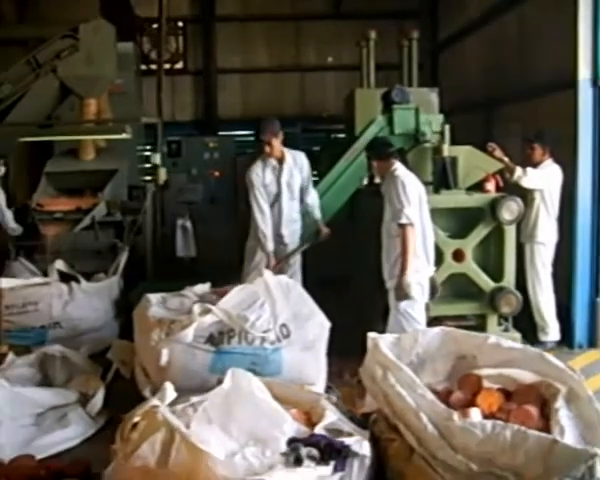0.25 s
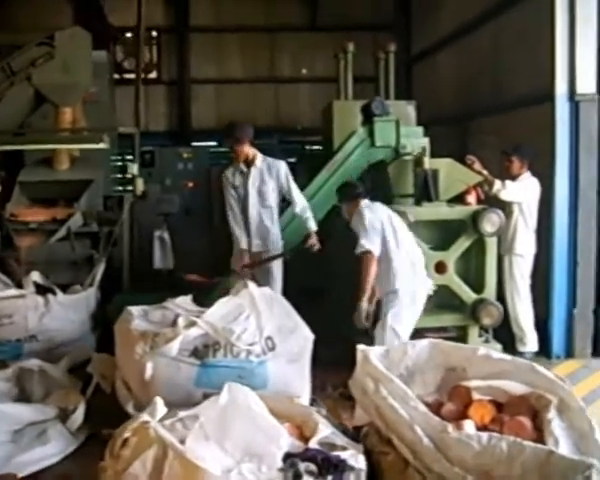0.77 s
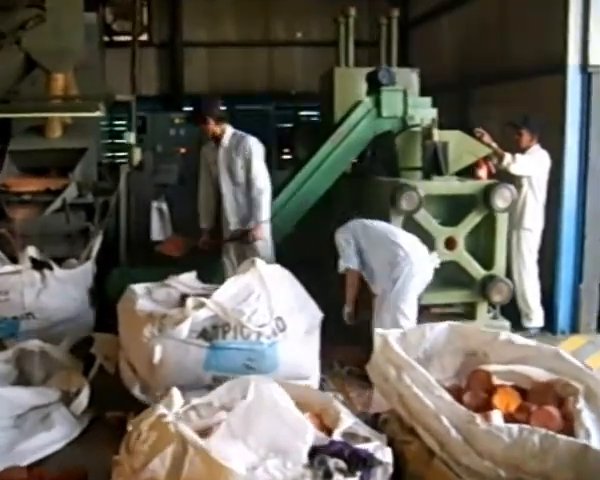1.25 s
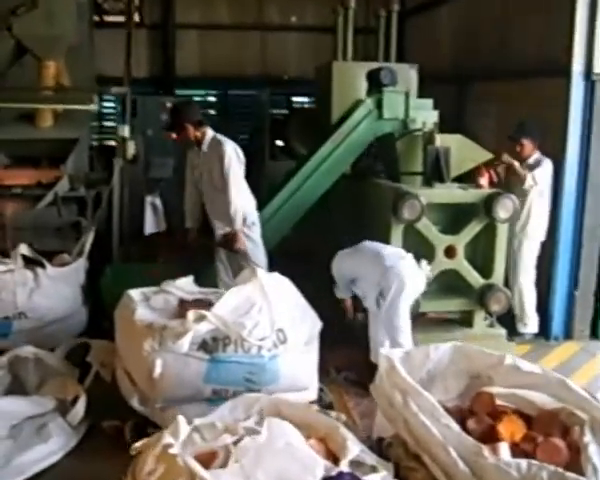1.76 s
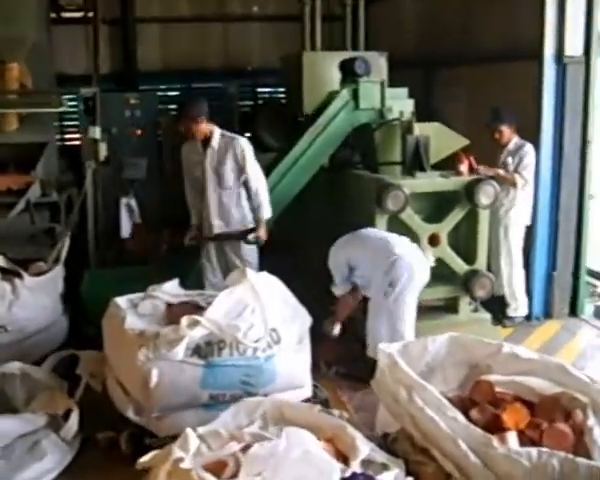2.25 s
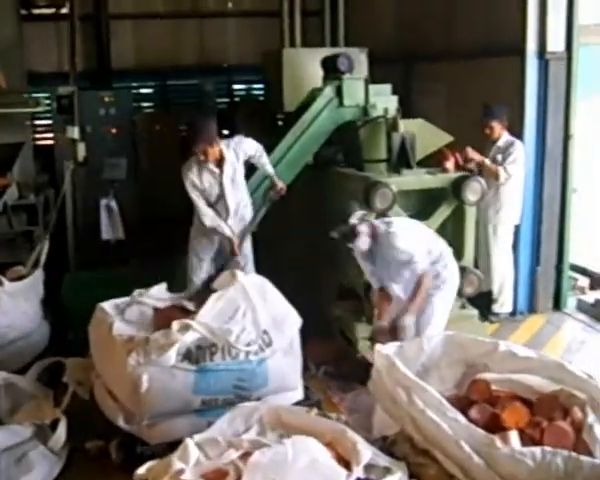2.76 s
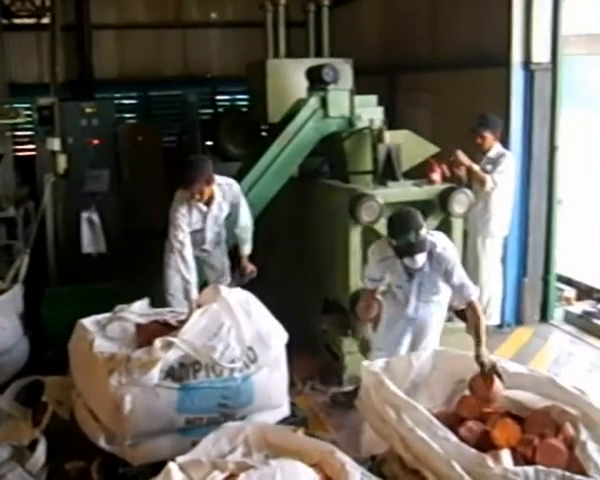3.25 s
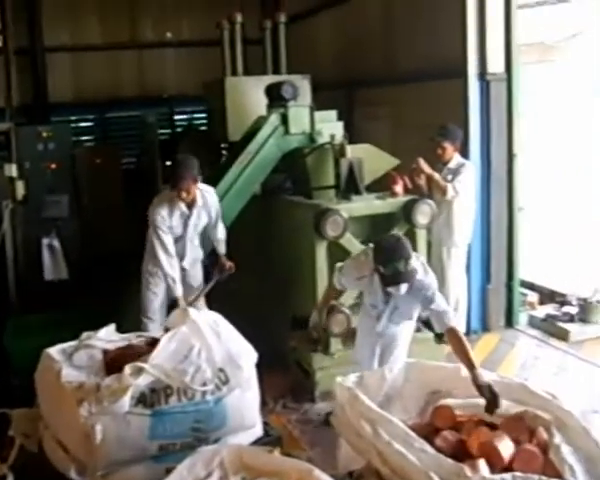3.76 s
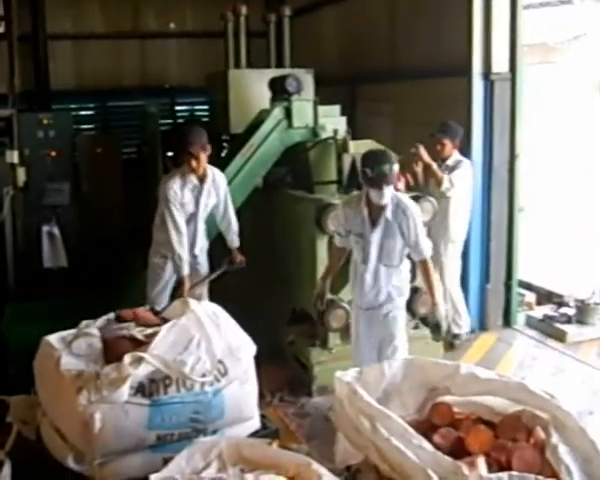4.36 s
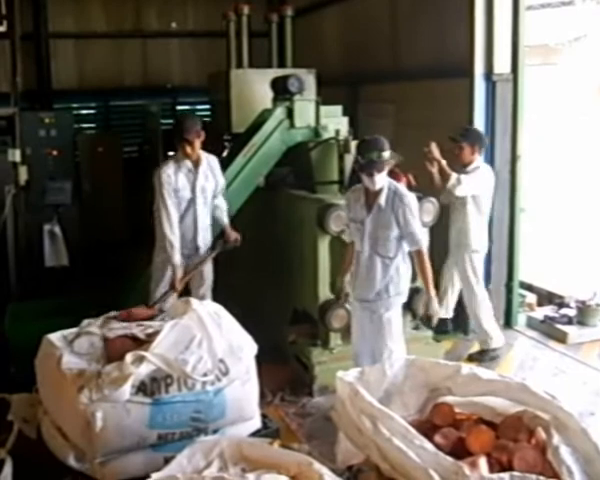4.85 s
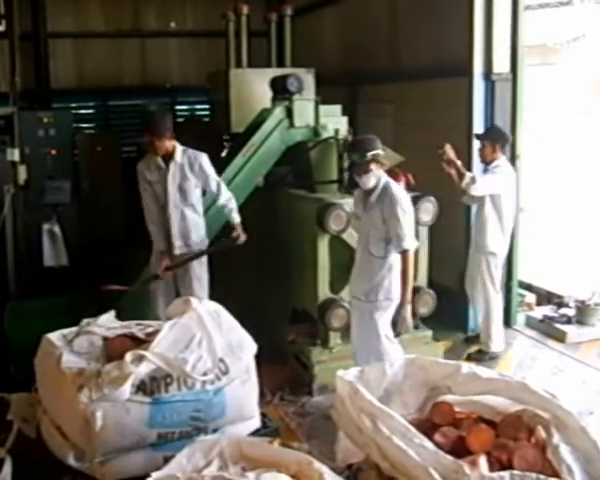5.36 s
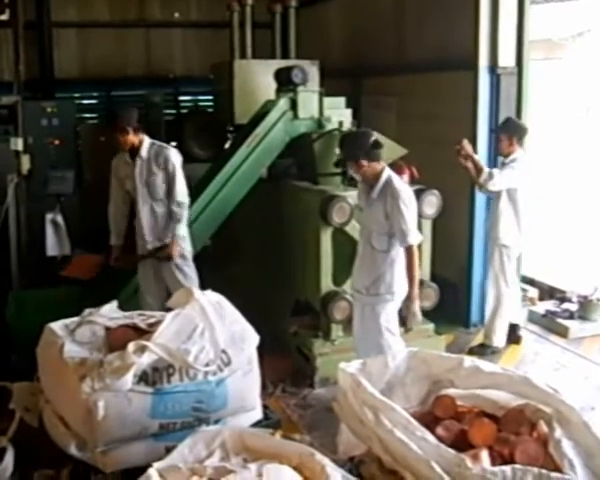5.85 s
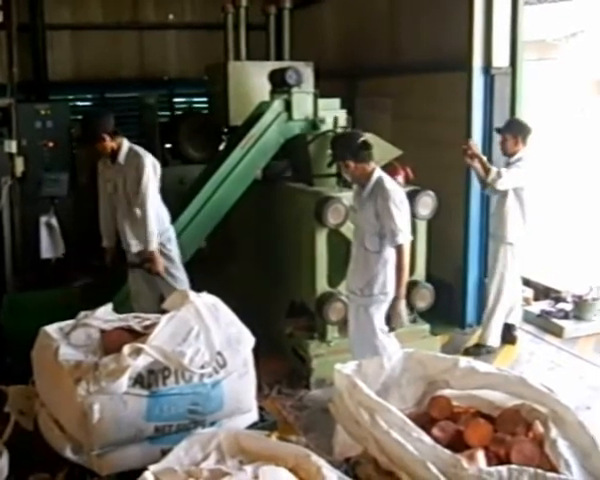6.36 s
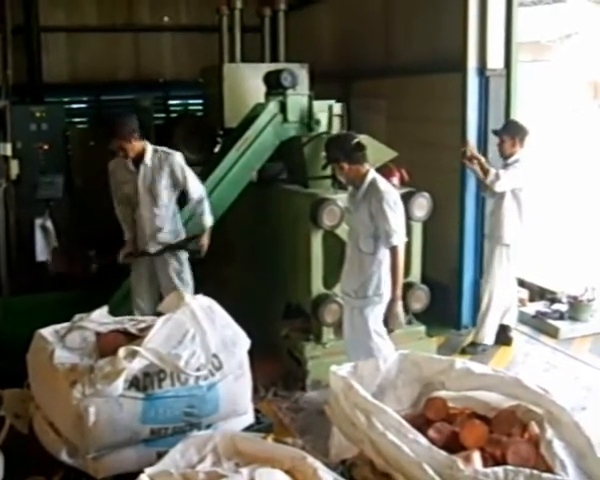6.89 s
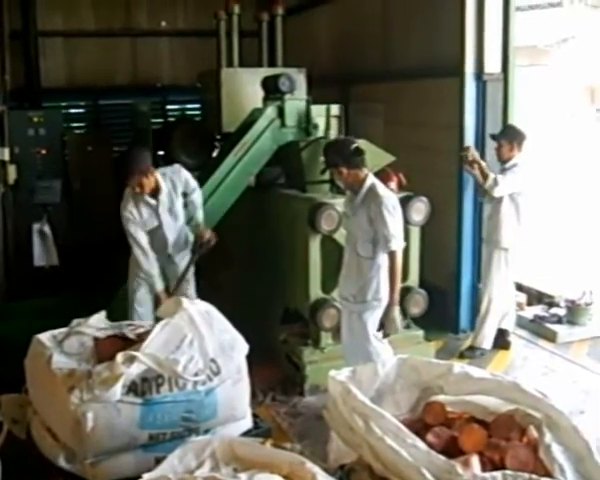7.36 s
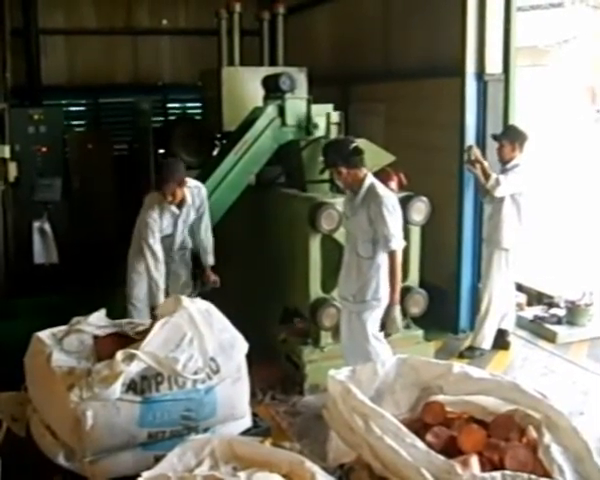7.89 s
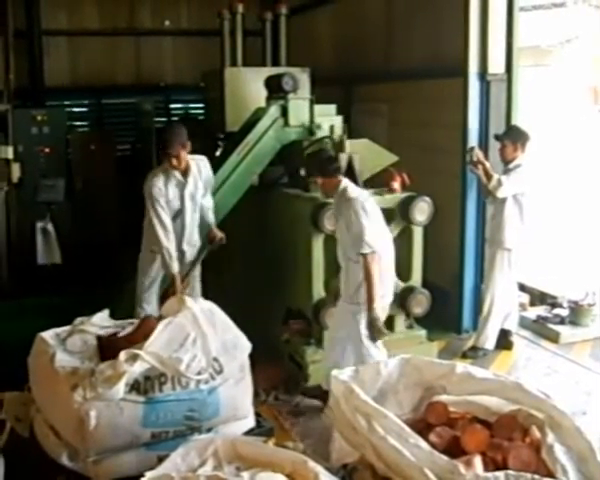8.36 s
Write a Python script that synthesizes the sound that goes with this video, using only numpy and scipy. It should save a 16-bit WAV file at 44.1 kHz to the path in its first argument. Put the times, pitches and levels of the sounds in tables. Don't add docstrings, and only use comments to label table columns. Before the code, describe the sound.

Constant low, humming machinery and airy roar fill an echoing factory shed, picked up a few metres away by a single slightly overloaded camera microphone. First a hard rattling clang of sheet metal and bar, then a soft thud. After a second of near silence the machines return abruptly under a harsh stick-slip groan, ending in a thud and chip spill. Finally paired bursts of steel knocks and clangs, with a last low groan.

```python
import sys
import numpy as np
from scipy import signal
from scipy.fft import rfft, irfft
from scipy.io import wavfile
from scipy.ndimage import uniform_filter1d

SR = 44100
rng = np.random.default_rng(int(sys.argv[2]) if len(sys.argv) > 2 else 0)


def field_ratio(decibels):
    return 10 ** (np.asarray(decibels, dtype=float) / 20)


def unload_audio(sound):
    columns = np.transpose(np.atleast_2d(sound))
    steps = np.round(np.clip(columns, -1, 1) * 32767)
    wavfile.write(sys.argv[1], SR, steps.astype(np.int16))


N = 380141
T = np.arange(N) / SR

MOTOR_HZ, PUMP_HZ, RAM_HZ = 24.51, 58.312, 114.4
RAM_SAG_HZ_PER_S = 1.2
SURGE_RISE_S, SURGE_FADE_S = 0.042, 0.065
ROAR_DB, SHED_DB = -19.5, -5
GAP_START_S, GAP_END_S = 4.0708, 5.0706

# partials (multiple of RAM_HZ, level/dB rms), surges (start t/s, stop t/s, level/dB)
GROWL_VOICE = [
    [(1, -29.5), (2, -28)],
    [(5.0, 5.72, -1), (5.9, 6.3, -7.5), (8.05, 8.5, -4)],
]
PIPE_VOICE = [
    [(7.39, -26)],
    [(5.36, 5.64, 0), (5.66, 5.82, -1.5)],
]
SEAL_VOICE = [
    [(10.02, -26), (11, -36)],
    [(5.08, 5.18, -6), (5.16, 5.5, -1), (5.5, 5.76, -3)],
]
WHINE_VOICE = [
    [(13, -29), (14, -30.5)],
    [(5.08, 5.33, -2.5), (5.38, 5.55, -2.5), (5.56, 5.72, 1)],
]
SQUEAL_VOICE = [
    [(16, -31)],
    [(5.13, 5.36, -1), (5.58, 5.68, -1)],
]

# broad colour (f/Hz, level/dB per Hz), rings (f/Hz, width/Hz, level/dB)
CHUTE_BODY = [
    [(60, -28), (120, -5.5), (300, 0.5), (600, -4), (1500, -2), (2700, -13), (3500, -13.5), (6000, -25.5), (11000, -42)],
    [(576, 31, 3.5), (874, 32, -6), (1386, 86, -11), (1800, 150, -13), (2080, 46, -14), (3160, 36, -16), (3550, 69, -15), (3940, 39, -19), (4470, 34, -20.5), (5100, 74, -18.5)],
]
HOPPER_BODY = [
    [(60, -26), (120, -5.5), (300, 1), (1000, -3), (2000, -8), (2600, -16), (4000, -11), (7000, -21), (11000, -47)],
    [(294, 33, 0), (483, 39, 1.5), (820, 40, 2), (1014, 18, 4), (1267, 27, 2), (1520, 30, -7), (1744, 41, -8), (1940, 31, -15), (2183, 44, -14), (3270, 140, -14), (4860, 200, -12)],
]
FRAME_BODY = [
    [(40, -28), (90, -3), (170, 6.5), (400, -5), (1000, -8), (1700, -8), (2500, -13), (5000, -17), (9000, -49)],
    [(216, 35, 5), (440, 27, 2), (1014, 27, -2.5), (1570, 180, -13), (2660, 55, -13), (3550, 45, -15)],
]
FLOOR_BODY = [
    [(40, -30), (90, -7.5), (170, 0), (380, -5.5), (800, -14), (2000, -19), (5000, -39)],
    [(170, 70, 0.5), (354, 50, -2)],
]
CHIPS_BODY = [
    [(100, -23), (300, -3), (900, 2), (2000, -1), (4500, -4), (7000, -13.5), (10000, -16), (12000, -27)],
    [(845, 55, 2.5), (2230, 80, -6)],
]
PLATE_BODY = [
    [(1500, -19.5), (2800, -10), (3200, -0.5), (4600, -3.5), (5500, -13), (9000, -30.5)],
    [(3230, 60, 1.5), (3550, 80, -3.5), (4006, 60, -2.5), (4450, 80, -8)],
]
BAR_BODY = [
    [(400, -24), (700, -2.5), (1000, -3.5), (1700, -4), (2200, -7), (2600, -25), (5000, -41)],
    [(870, 70, -2), (1013, 60, 0.5), (1537, 35, -5)],
]
DRUM_BODY = [
    [(200, -20.5), (450, -3), (600, 1), (900, -4), (2000, -27)],
    [(589, 28, 0.5), (545, 30, -6)],
]
TUBE_BODY = [
    [(900, -20), (1500, 2), (1800, -2), (2500, -23)],
    [(1545, 20, 1), (1745, 35, -7)],
]

# (rise/s, rings against colour/dB, brightness/dB per octave, unevenness/dB)
CHUTE_TOUCH, HOPPER_TOUCH, FRAME_TOUCH = (.003, 2, -1.8, 3), (.003, -2, -1.5, 4), (.004, 0, 0, 4.5)
FLOOR_TOUCH, CHIP_TOUCH = (.011, -0.5, 0, 1.5), (.011, -7, 0.15, 0.2)
PLATE_TOUCH, BAR_TOUCH = (.0015, 3, -3, 3), (.001, .6, -1, 3)
DRUM_TOUCH, TUBE_TOUCH = (.002, 6, .1, 2.2), (.006, 6, .1, 2.2)

# (t/s, level/dB, rattle t60/s)
CHUTE_HITS = [
    (.123, -21.5, 0.3),
    (.14, -14, 0.22),
    (.182, -13.5, 0.1),
    (.165, -10.5, 0.08),
    (.205, -16, .05),
    (.232, -15, 0.3),
    (.278, -20, 0.2),
    (.335, -21, 0.38),
]
HOPPER_HITS = [
    (7.86, -15, 0.28),
    (7.88, -11, .2),
    (7.893, -15.5, 0.36),
    (7.933, -12.5, 0.33),
    (7.97, -14, .3),
    (8.02, -19, 0.23),
    (8.105, -22, .13),
    (7.998, -20, 0.14),
]
FRAME_HITS = [
    (7.475, -17, .4),
    (7.498, -17, 0.31),
    (7.515, -19, 0.27),
]
FLOOR_HITS = [
    (1.555, -14.5, 0.36),
    (1.6, -24, 0.31),
    (5.72, -17, .8),
    (7.54, -17.5, 0.62),
]
CHIP_HITS = [
    (5.665, -19.5, .57),
    (5.7, -17, .3),
    (5.75, -22, .29),
    (7.548, -11, 0.34),
    (7.575, -13.5, .38),
    (7.605, -23, .36),
    (7.65, -23, .55),
]
PLATE_HITS = [
    (.143, -17.5, 0.15),
    (.205, -23.5, .18),
    (.245, -29, .3),
    (7.87, -24, .18),
    (7.918, -21.5, 0.13),
]
BAR_HITS = [
    (.137, -10.5, 0.11),
    (.21, -17, .2),
    (.232, -18, .15),
    (.28, -21.5, .2),
    (7.465, -12, 0.092),
    (7.861, -15.5, .3),
    (7.895, -16, 0.33),
    (7.95, -18.5, 0.28),
    (8.015, -20, 0.21),
]
DRUM_HITS = [
    (.141, -18.5, 0.13),
    (.174, -13.5, .08),
    (.232, -22.5, .08),
    (.335, -21, .1),
]
TUBE_HITS = [
    (7.9, -24, 0.22),
    (8.035, -27, 0.27),
]

# (multiple of shaft rate, level/dB rms)
MOTOR_LINES = [(1, -47.5), (3, -49), (8, -32.5), (9, -42), (10, -37), (13, -38), (15, -25), (16, -37.5),
               (17, -34), (18, -39), (19, -42), (20, -39.5), (22, -45.5), (24, -40), (31, -43), (38, -43)]
# (multiple of shaft rate, level/dB rms)
PUMP_LINES = [(4, -40.5), (8, -41.5), (9, -33), (10, -42.5), (11, -51.5), (12, -39.5), (13, -41),
              (14, -40.5), (15, -41), (16, -49), (17, -49.5), (18, -44.5), (21, -43), (23, -43.5),
              (24, -44.5), (26, -43), (27, -50), (29, -46.5), (31, -48), (32, -51.5), (33, -50.5),
              (37, -44.5), (38, -49.5), (39, -49), (41, -46.5), (42, -47.5), (45, -45), (50, -56),
              (51, -53), (59, -52)]
# (t/s, motor x15 level/dB, pump x9 level/dB)
STANDING_WAVE = [(0, -34, -33), (.6, -29, -36.5), (1.3, -25.5, -31.5), (1.65, -25, -27),
                 (2.3, -31.5, -37.5), (3.2, -28, -36.5), (4.0, -26, -34), (5.1, -28, -32), (6.2, -27, -33),
                 (6.9, -27, -31), (7.6, -30.5, -31.5), (8.6, -26.5, -34)]
# (f/Hz, level/dB rms)
OTHER_LINES = [(33.6, -48), (98, -44.5), (283.6, -39), (298.1, -41), (326.7, -45), (477.4, -38),
               (779.6, -45), (851.6, -46.5), (887.9, -47.5), (1152.4, -47)]
# (f/Hz, level/dB per Hz)
ROAR_SPECTRUM = [(20, -20), (50, -21), (80, -9), (125, -5), (200, -4.5), (330, 1), (520, -4.5), (800, -6.5),
                 (1400, -10.5), (2700, -15.5), (4000, -13.5), (7000, -20.5), (10000, -27), (12500, -36.5)]
# (f/Hz, t60/s)
SHED_DECAY = [(150, 1.3), (500, 1.0), (1500, 1.1), (4000, 1), (9000, 0.85)]
OVERFLOW_TIMES = [.2172, 7.8633, 7.86345, 7.8744, 7.9069, 7.9351, 7.9431]


def ram():
    out = np.zeros(N)
    sag_hz = RAM_SAG_HZ_PER_S * np.clip(T - 5.4, -.4, .4)
    phase = 2 * np.pi * np.cumsum(RAM_HZ - sag_hz) / SR + 0.086 * walk(10)
    for partials, surges in GROWL_VOICE, PIPE_VOICE, SEAL_VOICE, WHINE_VOICE, SQUEAL_VOICE:
        on = np.zeros(N)
        for start_s, stop_s, db in surges:
            rise = np.clip((T - start_s) / SURGE_RISE_S, 0, 1)
            fade = np.exp(-np.clip(T - stop_s, 0, 9) / SURGE_FADE_S)
            on = np.maximum(on, field_ratio(db) * rise * fade)
        for k, db in partials:
            level = np.sqrt(2) * field_ratio(db + 1.6 * walk(14))
            out += level * on * np.sin(k * phase + 2 * np.pi * rng.random() + .6 * walk(25))
    return out


def knocks():
    return (strike(CHUTE_BODY, CHUTE_TOUCH, CHUTE_HITS)
            + strike(HOPPER_BODY, HOPPER_TOUCH, HOPPER_HITS)
            + strike(FRAME_BODY, FRAME_TOUCH, FRAME_HITS)
            + strike(FLOOR_BODY, FLOOR_TOUCH, FLOOR_HITS)
            + strike(CHIPS_BODY, CHIP_TOUCH, CHIP_HITS)
            + strike(PLATE_BODY, PLATE_TOUCH, PLATE_HITS)
            + strike(BAR_BODY, BAR_TOUCH, BAR_HITS)
            + strike(DRUM_BODY, DRUM_TOUCH, DRUM_HITS)
            + strike(TUBE_BODY, TUBE_TOUCH, TUBE_HITS))


def brighten(rows, db_per_octave):
    return [(*row[:-1], row[-1] + db_per_octave * np.log2(row[0] / 1000)) for row in rows]


def strike(body, touch, blows):
    out, size = np.zeros(N + SR), SR
    t = T[:size]
    rise_s, rings_db, bright_db, grain_db = touch
    colour, rings = (brighten(part, bright_db) for part in body)
    for start_s, db, t60_s in blows:
        smooth = np.clip(t / rise_s, 0, 1) * field_ratio(-60 * t / t60_s)
        grain = np.interp(t * 300, np.arange(size), rng.standard_normal(size))
        shape = smooth * field_ratio(grain_db * grain)
        push = rng.standard_normal(size) * shape
        push[int(rise_s * SR)] += 14 * np.exp(-rise_s / 0.0024)
        rung = sum(field_ratio(g) * ring(push, hz, width) / np.sqrt(width) for hz, width, g in rings)
        clatter = unit(coloured(colour, size) * shape)
        blow = clatter + field_ratio(rings_db) * unit(rung)
        start = int(start_s * SR)
        out[start:start + size] += field_ratio(db) * np.sqrt(np.mean(smooth ** 2)) * blow
    return out[:N]


def motor_and_pump():
    s, motor_db, piston_db = np.transpose(STANDING_WAVE)
    loudest_lines = [(15 * MOTOR_HZ, np.interp(T, s, motor_db)), (9 * PUMP_HZ, np.interp(T, s, piston_db))]
    motor_lines = [(k * MOTOR_HZ, db) for k, db in MOTOR_LINES if k != 15]
    pump_lines = [(k * PUMP_HZ, db) for k, db in PUMP_LINES if k != 9]
    loudest = tones(loudest_lines, wander_db=1.6, wander_rad=.5, rate_hz=4)
    motor = tones(motor_lines, wander_db=2.6, wander_rad=0.43, rate_hz=4)
    pump = tones(pump_lines, wander_db=2.9, wander_rad=.6, rate_hz=3)
    return loudest + motor + pump


def other_machines():
    return tones(OTHER_LINES, wander_db=3.8, wander_rad=1.0, rate_hz=2)


def roar():
    hz = np.fft.rfftfreq(N, 1 / SR)
    spectrum = rfft(coloured(ROAR_SPECTRUM, N))
    out, swell = np.zeros(N), walk(0.86)
    throb = np.sin(2 * np.pi * 2 * MOTOR_HZ * T)
    for octave in range(10):
        share = np.clip(1 - np.abs(np.log2(hz / 25 + 1e-9) - octave), 0, 1)
        level_db = 0.31 * swell + .5 * walk(4.9) + 0.26 * throb
        out += irfft(spectrum * share, N) * field_ratio(level_db)
    return field_ratio(ROAR_DB) * unit(out)


def shed(x):
    size = int(1.5 * SR)
    t, hz = T[:size], np.fft.rfftfreq(size, 1 / SR)
    spectrum, tail = rfft(rng.standard_normal(size)), np.zeros(size)
    for octave in range(9):
        share = np.clip(1 - np.abs(np.log2(hz / 50 + 1e-9) - octave), 0, 1)
        t60_s = curve(50 * 2 ** octave, SHED_DECAY)
        tail += irfft(spectrum * share, size) * field_ratio(-60 * t / t60_s)
    tail *= np.clip(t / 0.011, 0, 1)
    return signal.fftconvolve(x, tail / np.sqrt(np.sum(tail ** 2)))[:N]


def unit(x):
    return x / np.sqrt(np.mean(x ** 2))


def curve(hz, table):
    f, v = np.transpose(table)
    return np.interp(np.log(hz + 1), np.log(f), v)


def walk(rate_hz):
    k = int(SR / rate_hz)
    held = np.repeat(rng.standard_normal(N // k + 1), k)
    return 1.2 * uniform_filter1d(uniform_filter1d(held, k), k)[:N]


def coloured(table, size):
    gain = field_ratio(curve(np.fft.rfftfreq(size, 1 / SR), table))
    return unit(irfft(rfft(rng.standard_normal(size)) * gain, size))


def ring(x, hz, width_hz):
    return signal.lfilter(*signal.iirpeak(hz, hz / width_hz, fs=SR), x)


def tones(lines, wander_db, wander_rad, rate_hz):
    out, step = np.zeros(N), 512
    for hz, db in lines:
        noise = rng.standard_normal((2, N // step + 2))
        slow = uniform_filter1d(noise, int(SR / step / rate_hz), axis=1)
        swell, turn = (np.interp(np.arange(N) / step, np.arange(len(s)), unit(s)) for s in slow)
        phase = 2 * np.pi * (hz * T + rng.random()) + wander_rad * turn
        out += np.sqrt(2) * field_ratio(db + wander_db * swell) * np.sin(phase)
    return out


def overflow(x):
    for s in OVERFLOW_TIMES:
        swing = np.exp(-((T - s) / .00025) ** 2)
        x = x * (1 - swing) - .78 * swing
    flipped = np.isin(np.arange(N), (np.array(OVERFLOW_TIMES) * SR).astype(int))
    return x + 1.75 * flipped


def ragged_treble(x):
    hz, _, cells = signal.stft(x, SR, nperseg=4096)
    frames = cells.shape[-1]
    hz = hz[:, None]
    edge_hz = 12380 - 420 * rng.random(frames) ** 2
    island = (np.abs(hz - 12650) < 60) & (rng.random(frames) < .15)
    lost = rng.random((len(hz), frames)) < np.clip((hz - 9500) / 4500, 0, 1)
    kept = ((hz < edge_hz) | island) & ~lost
    return signal.istft(cells * kept, SR, nperseg=4096)[1][..., :N]


def side_flecks(x):
    hz, _, cells = signal.stft(x, SR, nperseg=2048)
    band = (5 * np.log2(1 + hz / 1000)).astype(int)
    chance = np.interp(hz, [1200, 2600, 5000, 9500, 9600], [0, .03, .022, .008, 0])
    odd = rng.random((band.max() + 1, cells.shape[1]))[band] < chance[:, None]
    turned = cells * odd * np.exp(2j * np.pi * rng.random(cells.shape))
    return field_ratio(-11) * signal.istft(turned, SR, nperseg=2048)[1][:N]


def dropout(x):
    inside_s = np.minimum(T - GAP_START_S, GAP_END_S - T)
    reach_s = np.where(T < (GAP_START_S + GAP_END_S) / 2, .056, .068)
    fade = np.cos(np.pi / 2 * np.clip(inside_s / reach_s, 0, 1)) ** 1.17
    smear = field_ratio(-51.0) * fade * (inside_s < reach_s)
    faint = coloured([(60, -24), (250, -12), (500, -11), (3000, -4), (10000, -3.5), (12500, -11.0)], N)
    return np.where(inside_s > 0, smear * faint, x)


def scene():
    struck = knocks()
    machines = motor_and_pump() + other_machines() + roar()
    mono = ram() + struck + field_ratio(SHED_DB) * shed(struck) + machines
    return np.array([mono, mono])


def low_pass(x):
    return signal.sosfilt(signal.butter(12, 13010, fs=SR, output="sos"), x)


def record(dry):
    x = dropout(ragged_treble(overflow(np.clip(dry, -.96, .96))))
    mix = x + side_flecks(x[0]) * np.array([[1], [-1]])
    return low_pass(mix)


dry = scene()
out = record(dry)
unload_audio(out)
```